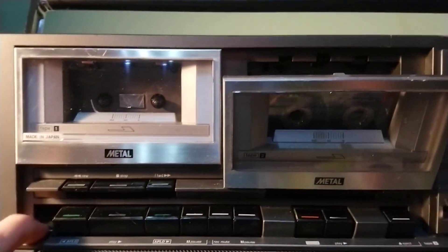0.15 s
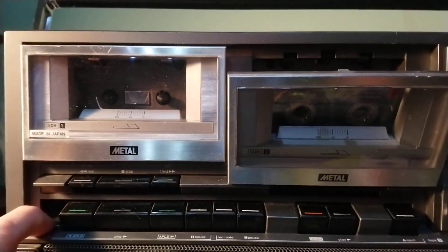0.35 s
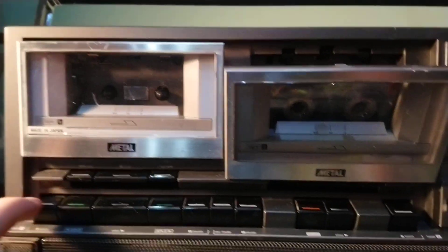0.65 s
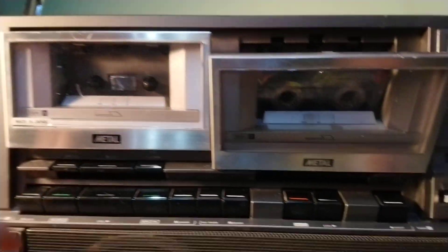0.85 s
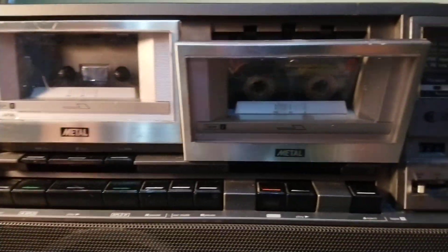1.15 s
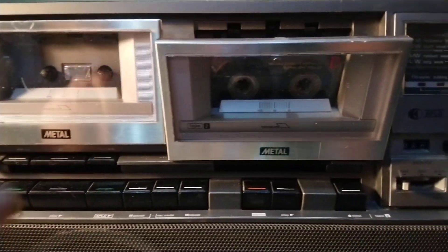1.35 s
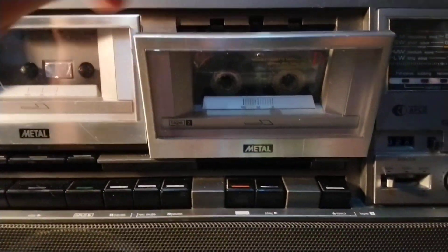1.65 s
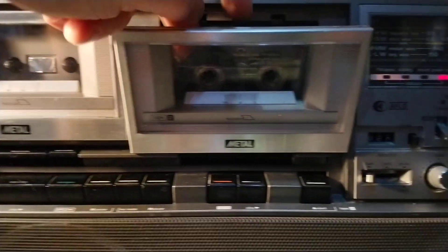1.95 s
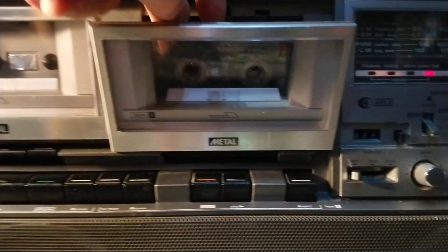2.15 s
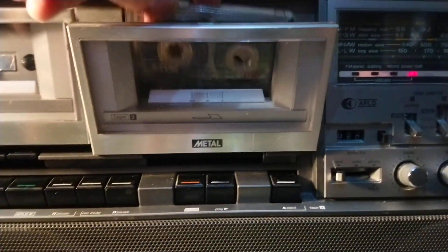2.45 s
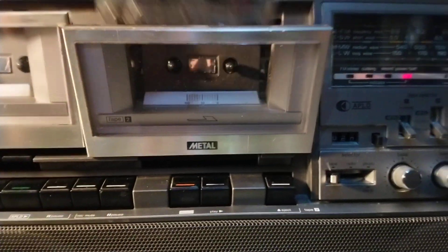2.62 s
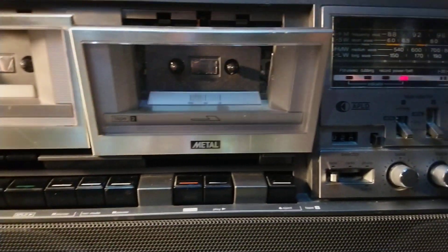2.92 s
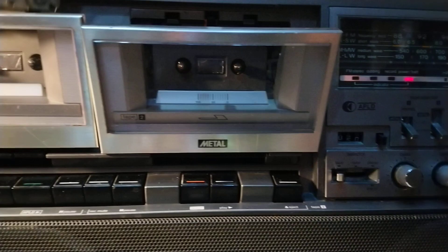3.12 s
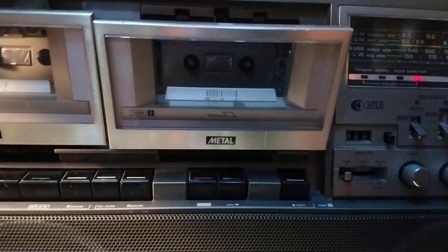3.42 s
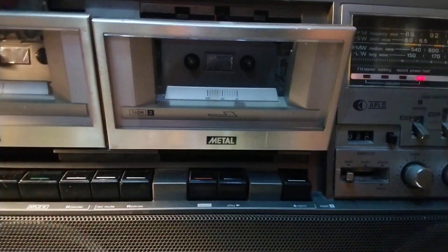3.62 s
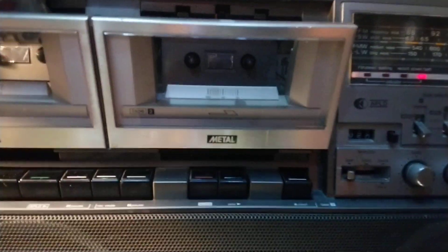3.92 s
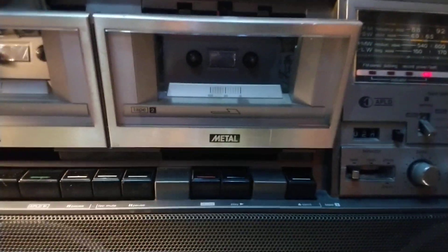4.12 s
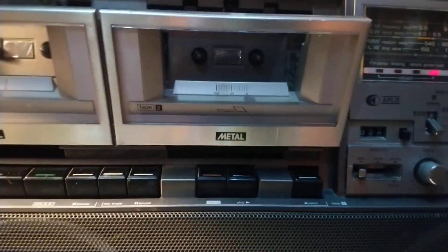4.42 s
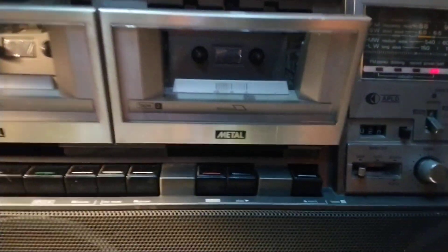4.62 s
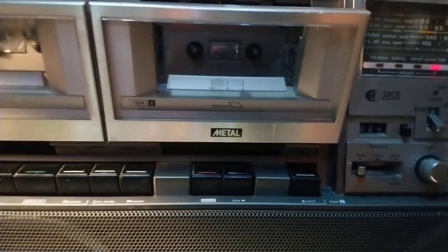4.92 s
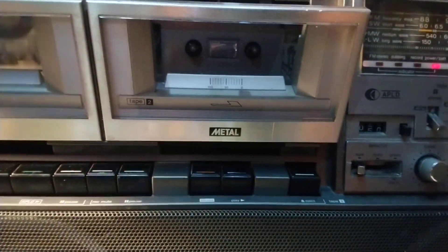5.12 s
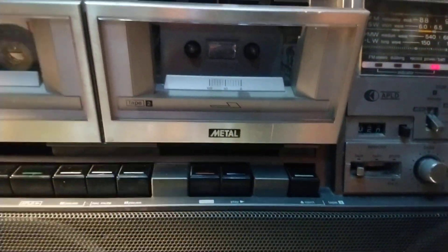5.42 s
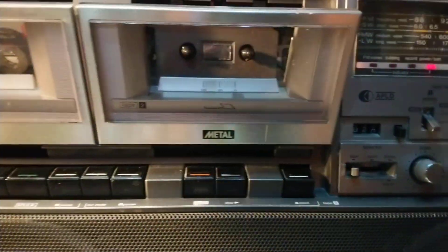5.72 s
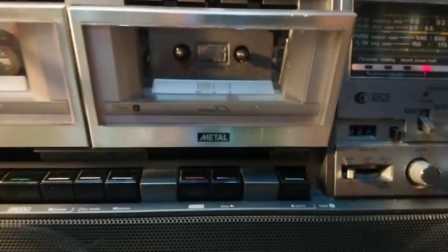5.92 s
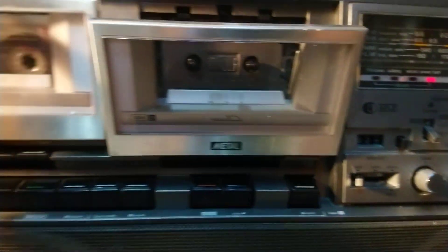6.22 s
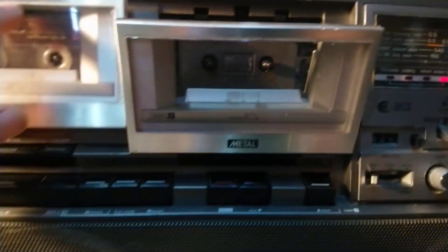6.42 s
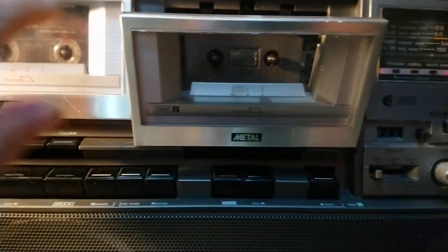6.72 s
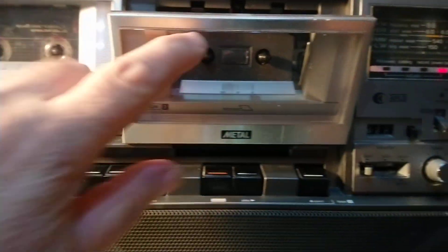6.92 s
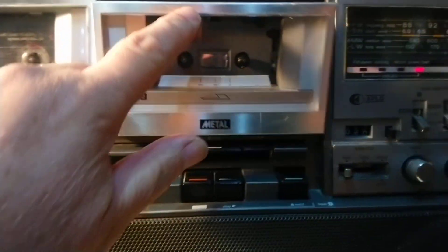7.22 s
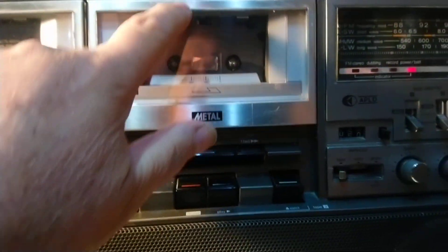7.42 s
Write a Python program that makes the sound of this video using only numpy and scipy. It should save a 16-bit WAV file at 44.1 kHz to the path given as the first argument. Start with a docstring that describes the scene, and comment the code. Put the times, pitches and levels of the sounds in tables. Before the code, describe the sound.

A quiet indoor room with soft hiss, very faint mains hum and low handling rumble, picked up closely by a handheld stereo microphone. A tiny tick at 0.1 s precedes a key press: dull clicks at 0.6 and 0.7 s, leaving a thin spring ring. From 1.8 s plastic rubs lightly, with a small knock near 2.1 s, then crisp bright clacks at 2.4 and 2.6 s as a cassette comes out. Between 3.5 and 4.7 s loose cassettes clatter irregularly in duller, hollow knocks, strongest around 3.9 and 4.7 s. Squeaky sliding and taps at 5.0-5.4 s lead into the loudest, hollow clunk at 5.45 s as one drops in. Small knocks and rubbing fade by 6.1 s. A door latches with a sharp, bright snap at 6.55 s, its metallic ring lingering faintly. After near quiet, the other door snaps shut at 7.47 s with a low, resonant ring.

```python
"""Plastic knocks of a twin cassette deck worked by hand in a quiet room: a key is pressed, a cassette slides
out of its door, others clatter close by, one drops in and the doors snap shut. Knocks are bursts of filtered
noise with a short note, latches tick in treble noise, sliding shells rub in grainy noise, and springs ring on
as dying sines. The room echoes; below lie its hiss, mains hum and the rumble of a hand-held microphone pair."""
import sys
import numpy as np
from scipy import signal
from scipy.fft import rfft, irfft, next_fast_len
from scipy.io import wavfile
from scipy.ndimage import uniform_filter1d, minimum_filter1d

SR = 44100
rng = np.random.default_rng(int(sys.argv[2]) if len(sys.argv) > 2 else 0)


def log_audio(samples):
    """Write samples as a 16-bit WAV file to the path given in sys.argv[1]."""
    # one column per channel
    frames = np.atleast_2d(samples).T
    # limit to full scale, then quantise
    limited = np.clip(frames, -1, 1)
    pcm = np.round(limited * 32767).astype(np.int16)
    wavfile.write(sys.argv[1], SR, pcm)


N = 333131

# room and microphone hiss, relative strength: pitch_hz [Hz], level_db [dB per Hz]
HISS_SPECTRUM = [(28, -37.5), (50, -3), (100, -3), (200, -7.5), (330, -9), (560, -17), (800, -10),
                 (1400, -15), (2400, -15), (5500, -18.5), (7100, -22.5), (8100, -33), (9500, -22),
                 (13300, -44.5), (15500, -25)]
# how alike the hiss is on left and right: pitch_hz [Hz], likeness [0 to 1]
HISS_LIKENESS = [(60, 0.35), (240, 0.59), (950, 0.072), (15000, 0.069)]
# mains hum, level before it wavers: pitch_hz [Hz], level_db [dB]
HUM_TONES = [(102.3, -69.5), (199.2, -73)]
# jolts of the grip on the microphone: peak_s [s], level_db [dB]
GRIP_JOLTS = [(0.59, -61), (2.06, -65), (3.83, -59.5), (5.46, -59.5), (6.38, -65), (6.56, -47), (7.02, -58),
              (7.55, -41)]
# left minus right tone difference at full strength: pitch_hz [Hz], difference_db [dB]
LEFT_MINUS_RIGHT = [(60, 2.5), (410, -0.5), (520, 12), (660, -0.5), (1070, -2.5), (1730, -15.5),
                    (2200, -20), (3100, -8.5), (4520, -16.5), (5740, -24), (7300, 11.5), (9280, 26.5),
                    (11800, -6), (15000, -3)]
# sharp dip in both ports: pitch_hz [Hz], width_hz [Hz], level_db [dB]
PORT_DIP = (8100, 1300, -20)
# broad dip in both ports: pitch_hz [Hz], width_hz [Hz], level_db [dB]
PORT_BROAD_DIP = (11630, 10700, -14)
# springs, plates and panels set ringing: start_s [s], pitch_hz [Hz], level_db [dB], fall_60db_s [s]
RINGING_PARTS = [(0.583, 277, -39.5, .14), (0.699, 276.6, -62, 2.5), (.712, 905, -46, .1),
                 (0.721, 375, -54, .15), (.713, 2090, -51, .2), (1.07, 2570, -66, 0.22),
                 (1.246, 2630, -63, 0.25), (2.391, 369, -39.5, 0.25), (2.388, 4790, -34, 0.038),
                 (2.638, 390, -37.5, .15), (2.64, 5640, -26, 0.046), (2.6404, 3240, -30, 0.051),
                 (3.799, 2165, -42.5, .13), (5.4405, 620, -20, .15), (5.4405, 719, -19.5, .14),
                 (5.446, 522, -27, .13), (5.45, 375, -45, .55), (5.452, 1160, -29, .09),
                 (5.453, 5300, -24, .09), (6.543, 3250, -27, .06), (6.552, 2030, -29, .07),
                 (6.55, 372, -37, .3), (6.555, 720, -34, .11), (6.68, 1272, -60.5, 4.0),
                 (6.69, 838, -65, 1.8), (7.474, 3530, -24.5, .07), (7.48, 1934, -32, .1),
                 (7.477, 377.6, -27.5, .4), (7.479, 139, -37.5, .9)]
# thin metallic ticks of latches: start_s [s], level_db [dB]
LATCH_TICKS = [(0.1184, -42.5), (0.582, -38.5), (0.7083, -48), (2.3877, -41), (2.637, -33), (5.441, -23),
               (5.4524, -37), (6.4642, -53), (6.506, -40), (6.54, -15), (6.552, -25), (7.2514, -52),
               (7.4711, -20), (7.51, -42)]
# strokes of the cassette shell in its guides: start_s [s], end_s [s], end_level_db [dB],
# swell_db [dB over the stroke], brightness_db [dB], squeak_hz [Hz], squeak_db [dB]
STROKES = [(1.82, 2.1, -69.5, 10, 9, 2420, 4.5), (2.145, 2.37, -62.5, 12, 5.5, 1880, 8.5),
           (2.48, 2.576, -54.5, 20, -8, 2400, 9), (2.546, 2.64, -54, 1, 6, 1200, 10.5),
           (3.67, 3.922, -55, 15, -6, 2200, 9), (4.8, 4.971, -65, 1, 3, 2200, 5),
           (4.961, 5.04, -50, 5, -1.5, 2200, 13), (5.063, 5.335, -59, 11, 2, 2280, -8),
           (5.363, 5.456, -50.5, 17.5, 5.5, 2300, 1), (5.954, 6.13, -68.5, 20, -2, 2200, 7),
           (6.295, 6.515, -70, 0, -15, 2100, 3)]
# notes of the rubbed cassette shell: pitch_hz [Hz], width_hz [Hz], level_db [dB]
SHELL_NOTES = [(1200, 170, 9.5), (2400, 420, 4), (4700, 300, -0.5)]
# broad resonances of the plastic case, before chance: pitch_hz [Hz], width_hz [Hz], level_db [dB]
CASE_RESONANCES = [(130, 31, 6), (272.4, 52, 9), (384.4, 71.7, 13.5), (552, 110, 8.5), (735, 143, 10.5),
                   (1120, 93, 7), (2200, 1660, 2.5), (3700, 210, 2), (5020, 450, 3), (6690, 700, 6),
                   (10760, 510, 19)]
# plastic knocks: start_s [s], level_db [dB], weight_db [dB], brightness_db [dB], ring_hz [Hz], ring_db [dB],
# crack_over_chatter_db [dB], chatter_60db_s [s, before each band stretches it]
PLASTIC_KNOCKS = [(0.0358, -60.5, 7.5, 7, 674, 4, -2.5, 0.058), (0.12, -61, -2, 2.5, 1960, 7, 0, 0.094),
                  (0.5648, -63.5, 10, 8, 1750, 8, -2, 0.38), (0.5833, -51, 8, 21, 5800, -1, -5, 0.035),
                  (0.691, -58.5, 6, 6, 940, 14, 2, 0.13), (0.7082, -42.5, -3.5, 5.5, 960, 13, -4.5, 0.069),
                  (0.719, -54, -17, -5, 5070, 11.5, -3, 0.11), (1.9969, -66.5, 11.5, 3, 3720, -2, 0, 0.33),
                  (2.0624, -48.5, -3, 5.5, 1160, 1, 8.5, 0.058),
                  (2.153, -62.5, -15, 6.5, 2600, 11.5, 10, .11),
                  (2.2487, -64.5, 11.5, -4, 720, 9, -7.5, 0.18),
                  (2.305, -44, -9.5, -16, 1660, 7, 8.5, 0.01), (2.371, -52.5, 6, -3, 2500, -3, -3.5, 0.23),
                  (2.3877, -27, -14.5, -2, 4700, -19, -2.5, 0.054),
                  (2.6378, -25.5, -12, 11.5, 3160, 3, -4.5, 0.024),
                  (2.65, -39, -8, 6, 2500, 2, -14.5, 0.097), (3.2423, -59.5, -28, -24, 1770, 14, 2, 0.027),
                  (3.4848, -43, -3.5, -3.5, 2090, -15, 1.5, 0.092),
                  (3.5852, -39.5, -1, -13, 2060, -3, 5, 0.078),
                  (3.7977, -47, -0.5, -10, 2050, 6.5, 0.5, 0.061),
                  (3.863, -60, 12, -17, 1660, 18, -4, 0.05),
                  (3.8889, -29.5, 2, -10.5, 1730, 1, -4.5, 0.034),
                  (3.9587, -44.5, 0, 0.5, 735, 5, -9.5, 0.056),
                  (4.035, -59.5, 13.5, -0.5, 710, 4.5, 6, 0.21),
                  (4.2571, -46, -7, -2.5, 1580, -8, -8.5, 0.063),
                  (4.473, -46, -11, -6, 673, 1, -5.5, 0.058), (4.7212, -31, -14, -4.5, 2150, -7, -4, 0.1),
                  (5.0353, -37.5, 1.5, -1.5, 1950, 12, -7, 0.077),
                  (5.0515, -31.5, 2, -17, 686, -1, -1, 0.018), (5.1759, -47.5, -2, -3, 2200, 20, 1, 0.038),
                  (5.25, -53.5, -0.5, -3.5, 2200, 0, -11, 0.19), (5.2802, -39, -3.5, -3, 2400, 3, 0, 0.082),
                  (5.4417, -11.5, -8.5, -1, 2240, -16.5, -1.5, 0.037),
                  (5.4523, -26.5, 0, 11.5, 3070, 4.5, -6.5, 0.06),
                  (5.4897, -30, -13.5, 2.5, 5500, -13, -1.5, 0.079),
                  (5.695, -51, 0, 0.5, 890, 3, -6.5, 0.022),
                  (5.9572, -50, -2.5, -7.5, 2180, -3.5, -1.5, 0.11),
                  (6.4079, -67.5, 6, 14, 2100, 13, 4.5, 0.1), (6.43, -59.5, 7.5, -2, 1200, 10, -8, 0.086),
                  (6.4622, -54.5, 3, 9, 2070, 6, -6, 0.081), (6.5067, -44.5, -1, 7, 824, -4, 4, 0.11),
                  (6.5403, -34.5, 6.5, 18.5, 3300, -5, -6.5, 0.075),
                  (6.552, -26.5, -6.5, 12, 5700, -6, -7, 0.061), (6.732, -61, 10, 2, 634, 7.5, 8.5, 0.19),
                  (6.876, -61, 8, -3, 2670, 12, -4, 0.091), (7.0612, -64, 4, -3, 1270, 2, -3, 0.14),
                  (7.2509, -67.5, 5, 18, 2490, 6, -6.5, 0.04), (7.3934, -67, 12.5, 4, 2780, 17, -2, 0.15),
                  (7.437, -44, 4.5, 5.5, 4500, -2, 5, 0.088), (7.472, -28, 6, 16.5, 5920, 1, -5, 0.025),
                  (7.4818, -26.5, 0.5, 2.5, 278, 5, -6.5, 0.039), (7.509, -49, 14.5, 4, 736, 2, -5, 0.13)]
# bands of a knock: low_hz [Hz], high_hz [Hz], stretch of its fall [times], level_db [dB],
# weight_share [share of weight_db], brightness_share [share of brightness_db]
KNOCK_BANDS = [(1290, 2730, 0.82, 1, 0.095, 0.071), (147, 550.4, 2.57, -13, 0.91, 0.066),
               (411.3, 1460, 1.78, -6, 0.63, 0), (2780, 6580, 1.06, -1, 0.15, 0.71)]


def amp(db):
    """Turns decibels into a plain multiplier."""
    return 10 ** (np.asarray(db) / 20)


def rms_one(x):
    """Scales a sound to an average strength (rms) of 1."""
    return x / np.sqrt(np.mean(x ** 2) + 1e-20)


def band(x, low_hz, high_hz, order=2):
    """Keeps the sound between two pitches."""
    edges_hz = [low_hz, min(high_hz, 0.45 * SR)]
    return signal.sosfilt(signal.butter(order, edges_hz, "band", fs=SR, output="sos"), x)


def one_side(x, split_hz, side):
    """Gently keeps what lies below ("low") or above ("high") a pitch."""
    return signal.sosfilt(signal.butter(1, split_hz, side, fs=SR, output="sos"), x)


def at_hz(points, hz):
    """Reads a curve at any pitch, with pitch spaced evenly by octave."""
    pitch_hz, value = np.array(points).T
    return np.interp(np.log(hz), np.log(pitch_hz), value)


def drift(rate_hz):
    """Slow random wandering of rms 1, made from smoothed noise."""
    step = 40   # samples between computed points
    r = np.exp(-2 * np.pi * rate_hz * step / SR)
    noise = rng.standard_normal(N // step + 2002)
    slow = signal.lfilter([1], [1, -2 * r, r * r], noise)[2000:]   # skip the filter's start
    return np.interp(np.arange(N) / step, np.arange(len(slow)), rms_one(slow))


def resonance(x, hz, width_hz):
    """Two-pole resonance, like one note of a solid part, with gain 1 on top."""
    r = np.exp(-np.pi * width_hz / SR)
    feedback = [1, -2 * r * np.cos(2 * np.pi * hz / SR), r * r]
    return signal.lfilter(np.array([1, 0, -1]) * (1 - r * r) / 2, feedback, x)


def bell(x, hz, width_hz, db):
    """Lifts or cuts a band around a pitch."""
    return x + (amp(db) - 1) * resonance(x, hz, width_hz)


def grains(shape, spread_db):
    """Dense tiny contacts of uneven size."""
    size_db = spread_db * np.minimum(rng.exponential(1, shape), 4)
    return rms_one(rng.standard_normal(shape) * amp(size_db))


def hiss():
    """Third-octave bands of stereo noise, most alike on both sides in the bass."""
    pair = 0
    edges_hz = 28 * 2 ** (np.arange(29) / 3)
    white = rng.standard_normal((2, 2, N + SR))   # neighbouring bands take turns
    for k, (low_hz, high_hz) in enumerate(zip(edges_hz, edges_hz[1:])):
        middle_hz = np.sqrt(low_hz * high_hz)
        mid, side = band(white[k % 2], low_hz, high_hz)[:, SR:]   # skip the filter's start
        alike = np.clip(at_hz(HISS_LIKENESS, middle_hz), -1, 1)
        stereo = np.sqrt(1 + alike) * mid + np.sqrt(1 - alike) * side * [[1], [-1]]
        pair = pair + amp(at_hz(HISS_SPECTRUM, middle_hz)) * stereo
    left, right = amp(-61.5) * rms_one(pair)
    return np.array([bell(left, 2700, 4300, -5.5), right])   # the left side is thinner around 2.7 kHz


def hum():
    """Mains hum: low steady sines that waver in level."""
    t = np.arange(N) / SR
    total = np.zeros(N)
    for pitch_hz, level_db in HUM_TONES:
        start_phase = rng.random()
        total += amp(level_db + 0.7 * drift(1.1)) * np.sin(2 * np.pi * (pitch_hz * t + start_phase))
    return total


def rumble():
    """Low noise from the grip, swelling fast at each jolt and settling; mostly common to both ports."""
    rise_db_per_s, fall_db_per_s = 250, 109.5
    t = np.arange(N) / SR
    level = amp(-88)   # the quiet grip between jolts
    for peak_s, level_db in GRIP_JOLTS:
        level = level + amp(level_db + np.minimum(rise_db_per_s * (t - peak_s), fall_db_per_s * (peak_s - t)))
    both, left, right = rms_one(band(rng.standard_normal((3, N)), 44, 100.6, order=4))
    return level * (both + 0.7 * np.array([left, right]))


def room(x):
    """Each side hears its own dense dying echo, whose treble dies sooner."""
    fall_60db_s, treble_fall_share, split_hz = 0.33, 0.56, 5000
    t = np.arange(SR // 2) / SR
    echo = rng.standard_normal((2, 2, len(t))) * np.clip(t / 0.0026, 0, 1)
    low = one_side(echo[0], split_hz, "low")
    high = one_side(echo[1], split_hz, "high")
    tail = low * amp(-60 * t / fall_60db_s) + high * amp(-60 * t / (treble_fall_share * fall_60db_s))
    tail /= np.sqrt(np.mean(np.sum(tail ** 2, axis=1)))
    return signal.fftconvolve(x[None], tail, axes=1)[:, :N]


def ports(near, far):
    """Direct sound reaches the right port later; bass echoes are alike, and each port has its own tone."""
    right_lag_s, alike_below_hz = 0.00026, 910
    shaded_share = 0.84   # the rest keeps the same tone in both ports
    late = np.interp(np.arange(N) - right_lag_s * SR, np.arange(N), near)
    echo_difference = one_side(far[0] - far[1], alike_below_hz, "high")
    pair = np.array([near + far[1] + echo_difference, late + far[1]])
    size = next_fast_len(N)
    pitch_hz = np.arange(1, size // 2 + 2) * SR / size
    shade_db = at_hz(LEFT_MINUS_RIGHT, pitch_hz)
    shaded = irfft(rfft(pair, size) * amp([shade_db / 2, -shade_db / 2]), size)[:, :N]
    blend = pair + shaded_share * (shaded - pair)
    return bell(bell(blend, *PORT_DIP), *PORT_BROAD_DIP)


def springs():
    """Dying sines that swell in over a few cycles, waver a little and stop when touched."""
    touch_s = 7.1   # the hand lands on the door; what still rings has faded out by now
    swell_cycles = 1.4
    total, clock = np.zeros(N), np.arange(N) / SR
    waver = amp(1.5 * drift(12))
    for start_s, pitch_hz, level_db, fall_60db_s in RINGING_PARTS:
        t = np.maximum(clock - start_s, 0)
        free = np.clip((touch_s - clock) / 0.022, 0, 1) if start_s < touch_s else 1
        swell = np.minimum(t * pitch_hz / swell_cycles, 1)
        total += amp(level_db - 60 * t / fall_60db_s) * free * swell * np.sin(2 * np.pi * pitch_hz * t)
    return total * waver


def ticks():
    """Latches tick: very short bursts of treble noise."""
    rise_s, fall_60db_s = 0.0038, 0.034
    start_s, level_db = np.array(LATCH_TICKS)[:, :1], np.array(LATCH_TICKS)[:, 1:]
    t = np.maximum(np.arange(N) / SR - start_s, 0)
    bursts = np.minimum(t / rise_s, 1) * amp(level_db - 60 * np.minimum(t, 1) / fall_60db_s)
    noise = rms_one(band(rng.standard_normal(N), 7800, 15100, order=3))
    return np.sum(bursts, axis=0) * noise


def slides():
    """Plastic rubs on plastic: dense grains sing in the shell, each stroke with its own squeak."""
    fade_in_s, stop_s = 0.07, 0.0023
    squeak_width_hz, squeak_loss_db = 420, 5.5   # loss per octave above the squeak
    rub = grains((2, N), spread_db=4.5) * amp(4.5 * drift(35))
    for note in SHELL_NOTES:
        rub = bell(rub, *note)
    dull = rms_one(band(rub[0], 460, 890))
    bright = rms_one(band(rub[1], 1000, 6900))
    out = np.zeros(N)
    for start_s, end_s, end_db, swell_db, bright_db, squeak_hz, squeak_db in STROKES:
        span = slice(round(start_s * SR), round(end_s * SR))
        t = np.arange(N)[span] / SR
        fade = np.clip(np.minimum((t - start_s) / fade_in_s, (end_s - t) / stop_s), 0, 1)
        stroke = fade * amp(end_db - swell_db * (end_s - t) / (end_s - start_s))
        sound = dull[span] + amp(bright_db) * bright[span]
        for octave in range(3):
            lift_db = max(squeak_db - squeak_loss_db * octave, 0)
            sound = bell(sound, squeak_hz * 2 ** octave, squeak_width_hz, lift_db)
        out[span] += stroke * sound
    return out


def casing(force, spread_db):
    """The hollow case lifts its resonances, unevenly for each place of contact."""
    chances = rng.standard_normal(len(CASE_RESONANCES))
    for (pitch_hz, width_hz, level_db), chance in zip(CASE_RESONANCES, chances):
        force = bell(force, pitch_hz, width_hz, level_db + spread_db * chance)
    return force


def knocks():
    """A sharp crack, then loose parts chatter: a dying burst of contacts, coloured by how and where it lands."""
    note_fall_60db_s, note_sharpness = 0.28, 11.1   # sharpness = pitch / width
    out, t = np.zeros(N + SR), np.arange(SR // 4) / SR
    for start_s, level_db, weight_db, bright_db, ring_hz, ring_db, crack_db, chatter_s in PLASTIC_KNOCKS:
        contacts = grains((2, len(t)), spread_db=1.5)
        force = 0
        rise = np.minimum(t / (0.0022 * amp(-crack_db)), 1)   # weaker cracks build up more slowly
        for k, (low_hz, high_hz, stretch, band_db, weight_share, bright_share) in enumerate(KNOCK_BANDS):
            chatter = amp(-60 * t / (max(chatter_s, 0.01) * stretch))
            crack = amp(crack_db - 60 * t / (0.0056 * stretch))
            shape = (chatter + crack) * rise
            source = contacts[1] if k == 0 else contacts[0]
            noise = band(source * shape, low_hz, high_hz, order=3)
            gain = amp(level_db + band_db + weight_share * weight_db + bright_share * bright_db)
            # the energy follows the shape of the burst, not the width of the band
            force = force + gain * noise * np.sqrt(np.sum(shape ** 2) / np.sum(noise ** 2))
        # the part that is hit has a short note of its own
        note = amp(ring_db - 60 * t / note_fall_60db_s) * resonance(force, ring_hz, ring_hz / note_sharpness)
        out[round(start_s * SR):][:len(t)] += casing(force + note, spread_db=0.5)
    return out[:N]


def scene():
    """The deck and its echo reach both ports, over hiss, hum and rumble."""
    deck = knocks() + ticks() + slides()
    echo = amp(-9) * room(deck)   # the springs are heard without echo
    return ports(deck + springs(), echo) + hiss() + hum() + rumble()


def record(dry):
    """A fast limiter ducks both channels around the highest peaks; the top is cut."""
    limit, cutoff_hz = 0.64, 16900
    span = SR // 250   # 4 ms
    gain = np.minimum(1, limit / (np.max(np.abs(dry), axis=0) + 1e-9))
    gain = uniform_filter1d(minimum_filter1d(gain, size=2 * span), size=span)
    return signal.sosfilt(signal.cheby2(12, 70, cutoff_hz, fs=SR, output="sos"), gain * dry)


dry = scene()
out = record(dry)
log_audio(out)
```